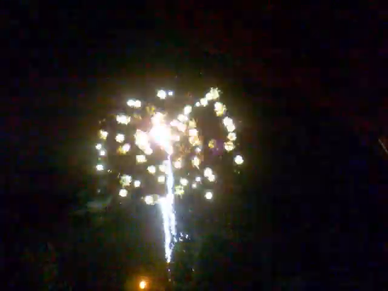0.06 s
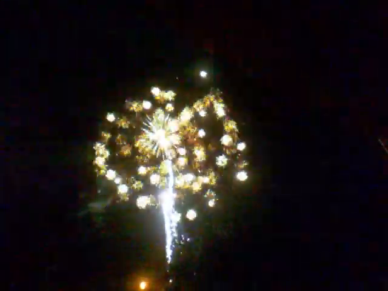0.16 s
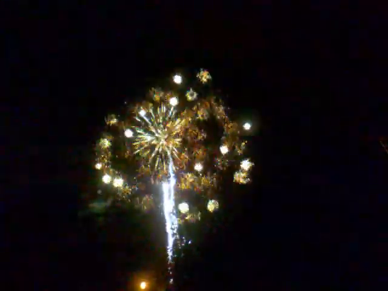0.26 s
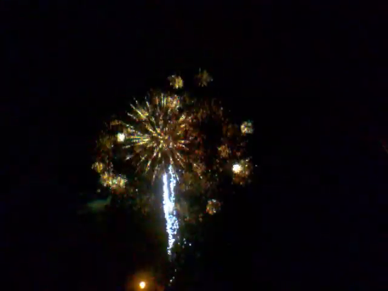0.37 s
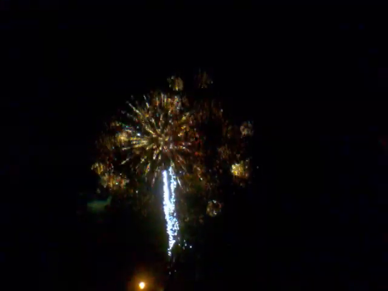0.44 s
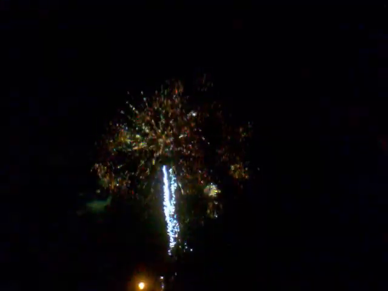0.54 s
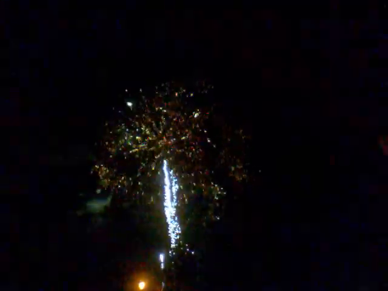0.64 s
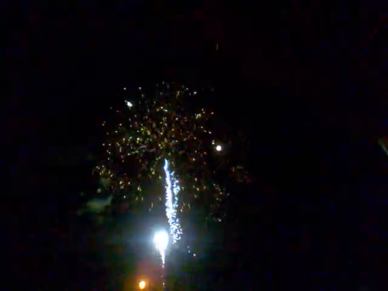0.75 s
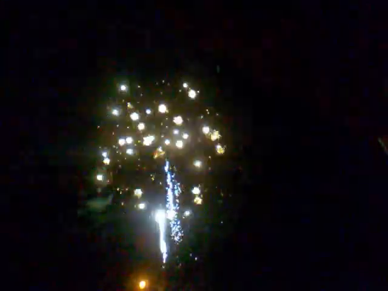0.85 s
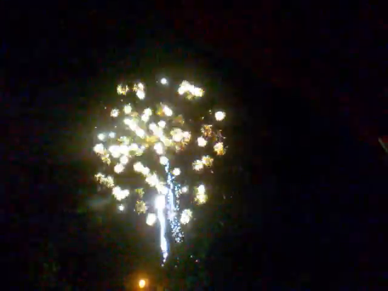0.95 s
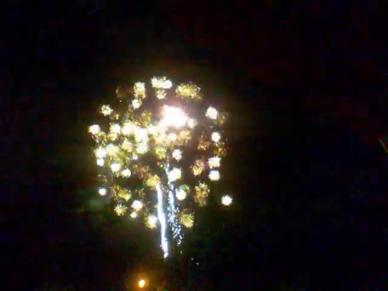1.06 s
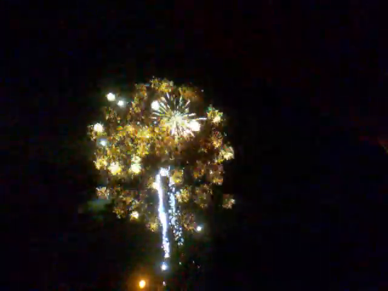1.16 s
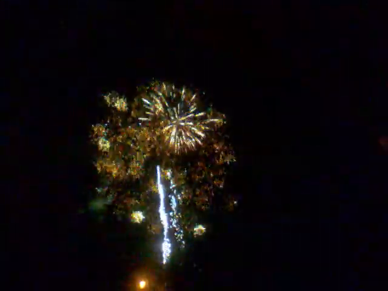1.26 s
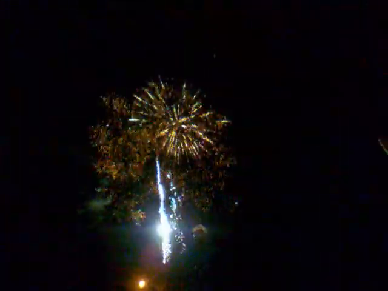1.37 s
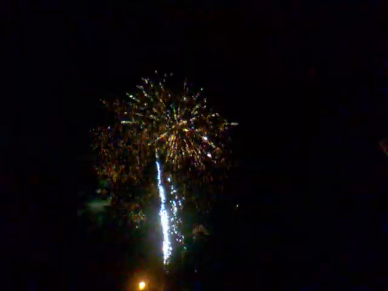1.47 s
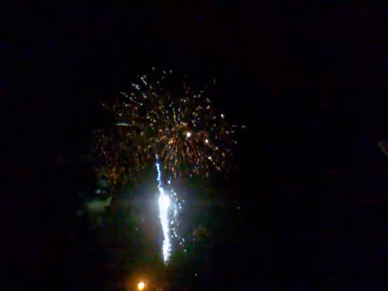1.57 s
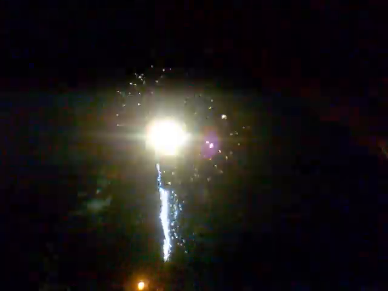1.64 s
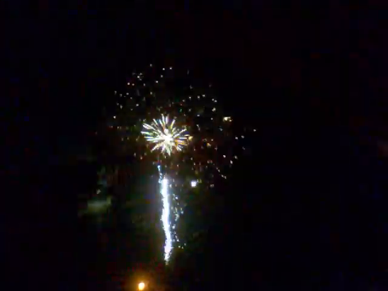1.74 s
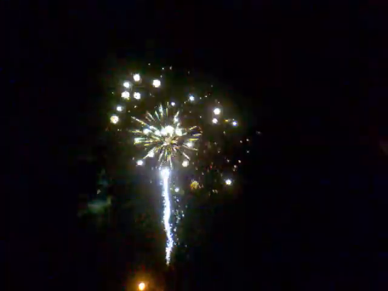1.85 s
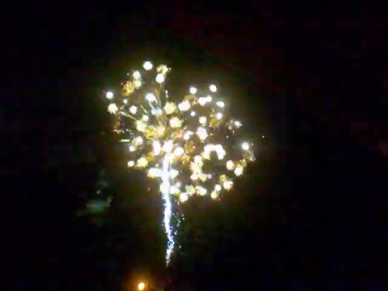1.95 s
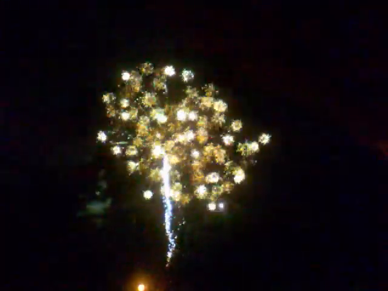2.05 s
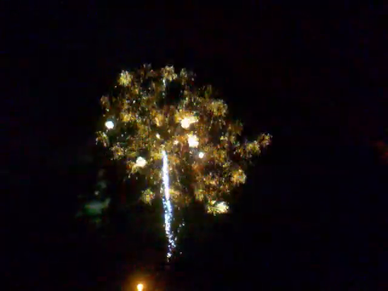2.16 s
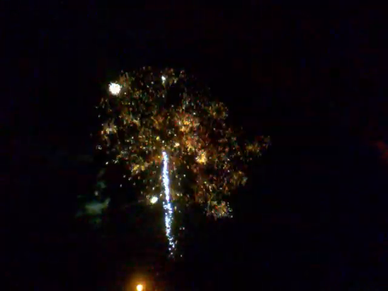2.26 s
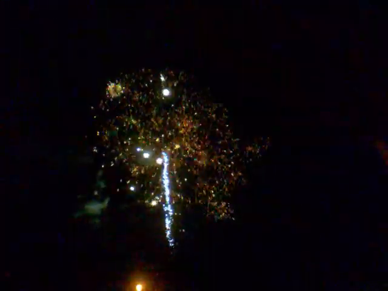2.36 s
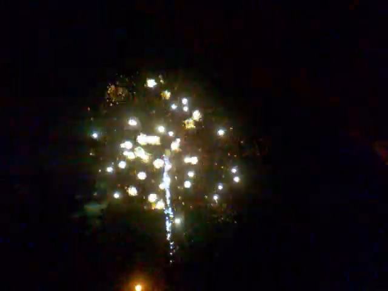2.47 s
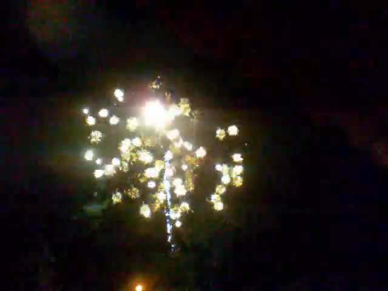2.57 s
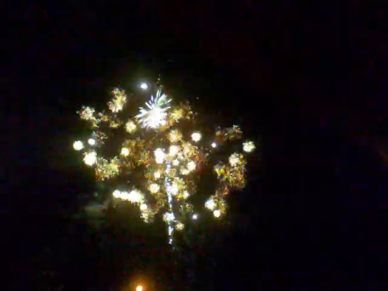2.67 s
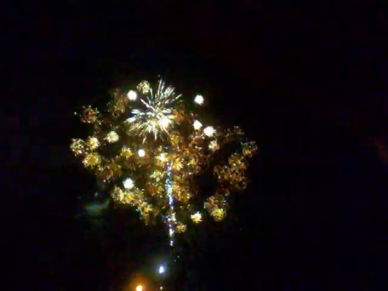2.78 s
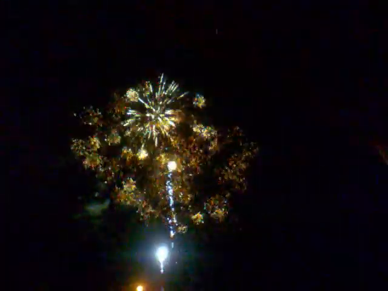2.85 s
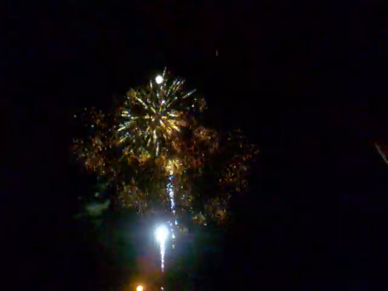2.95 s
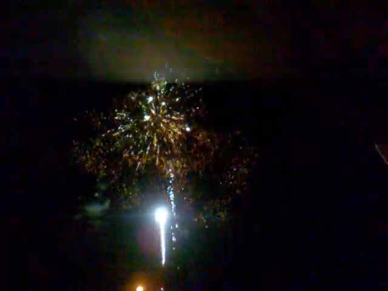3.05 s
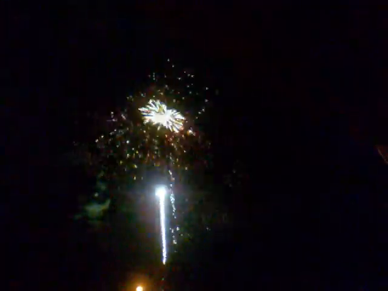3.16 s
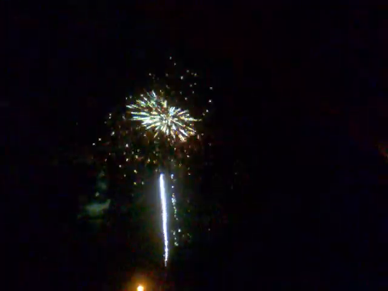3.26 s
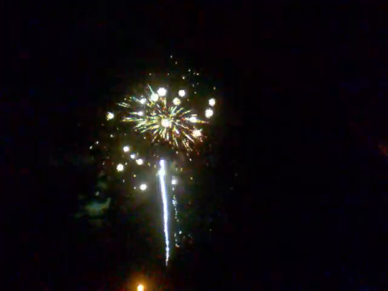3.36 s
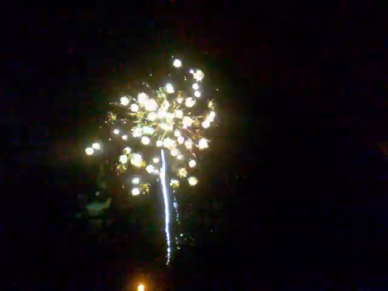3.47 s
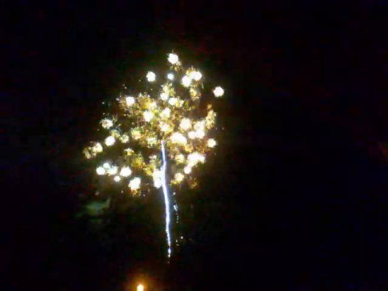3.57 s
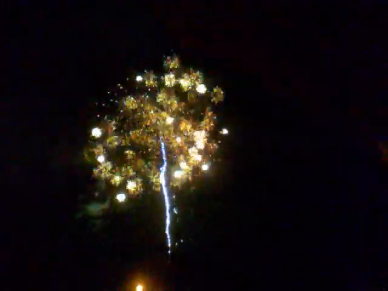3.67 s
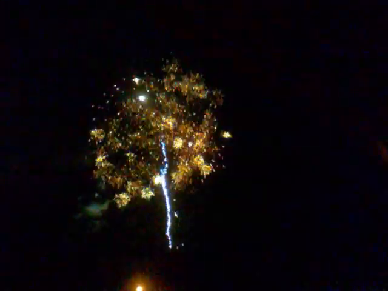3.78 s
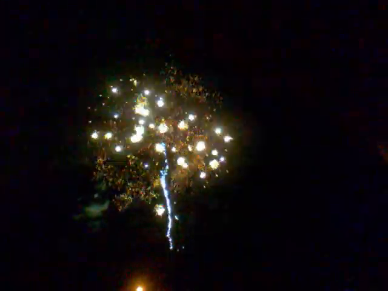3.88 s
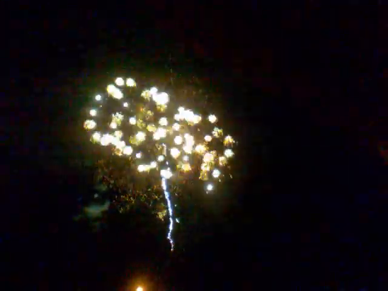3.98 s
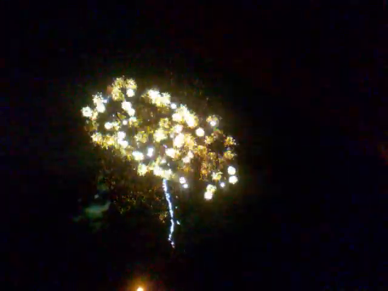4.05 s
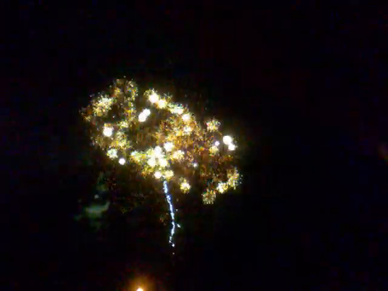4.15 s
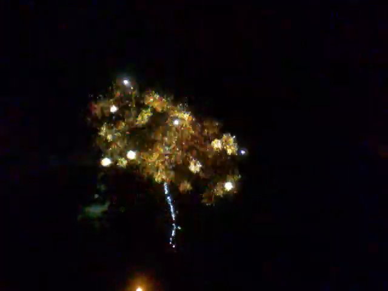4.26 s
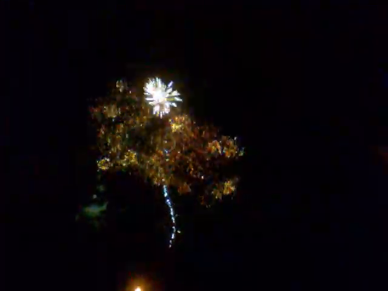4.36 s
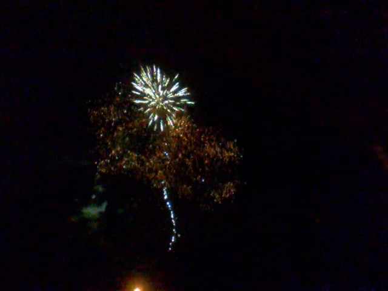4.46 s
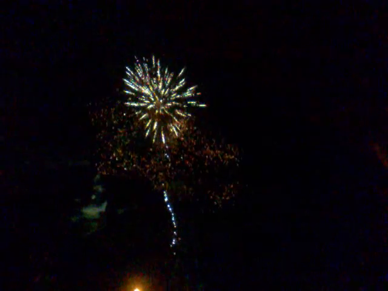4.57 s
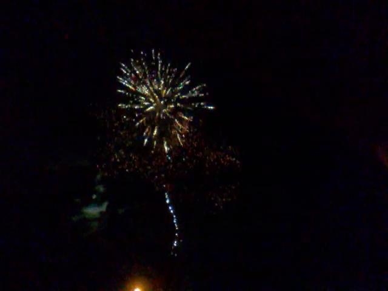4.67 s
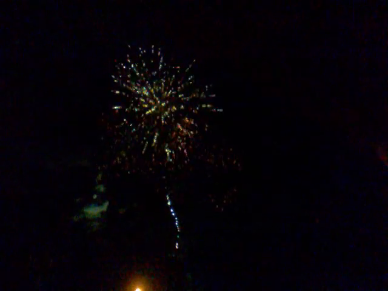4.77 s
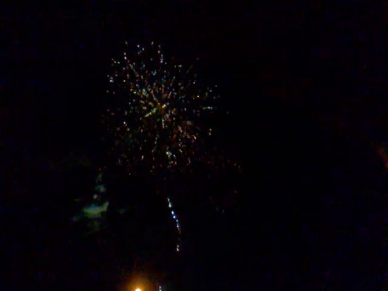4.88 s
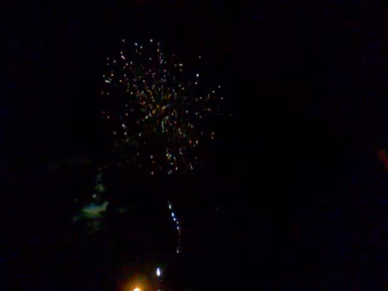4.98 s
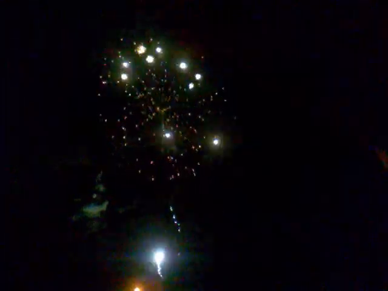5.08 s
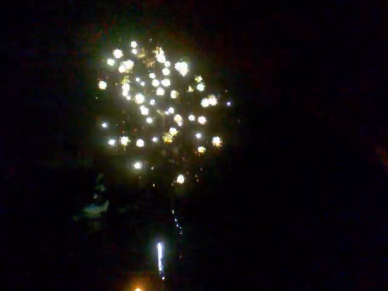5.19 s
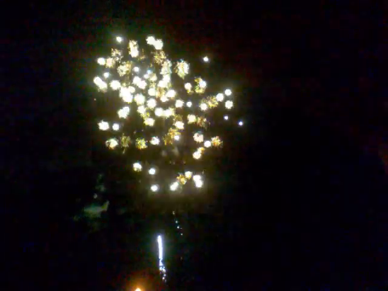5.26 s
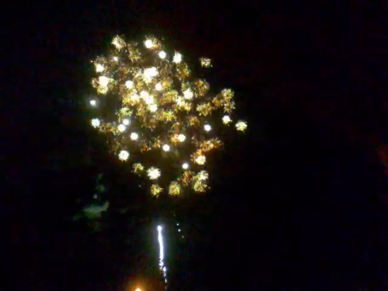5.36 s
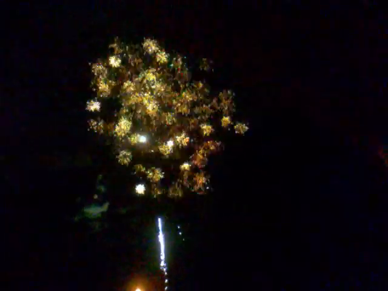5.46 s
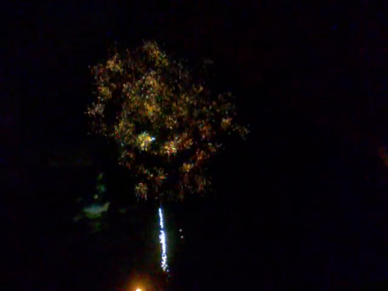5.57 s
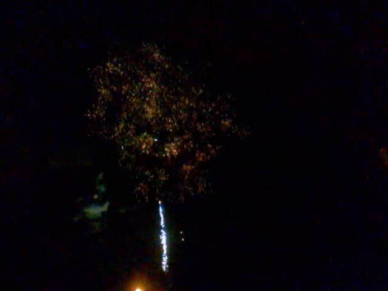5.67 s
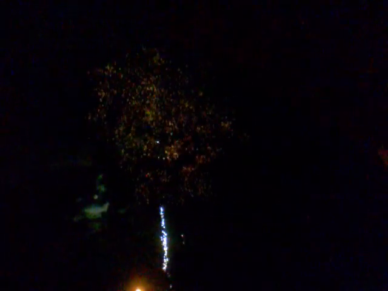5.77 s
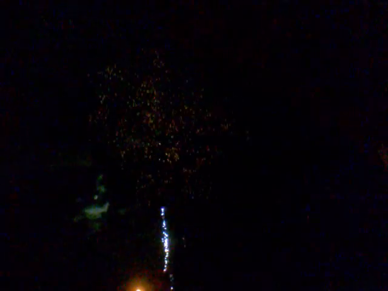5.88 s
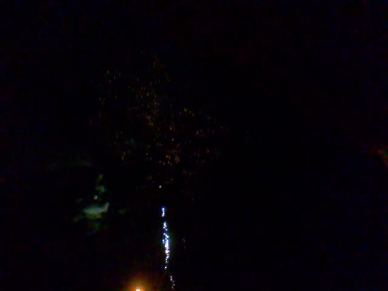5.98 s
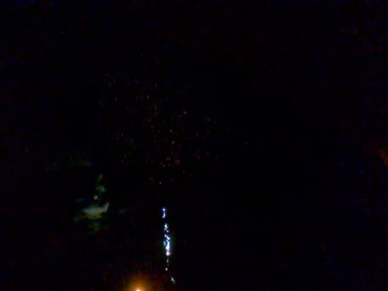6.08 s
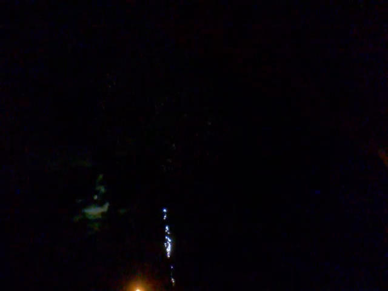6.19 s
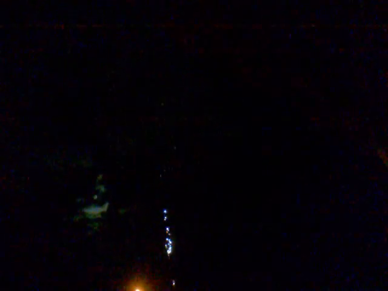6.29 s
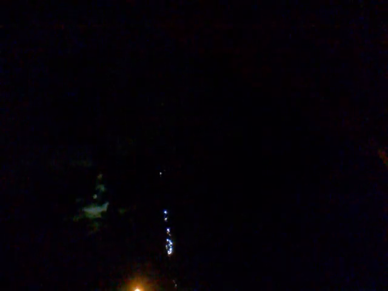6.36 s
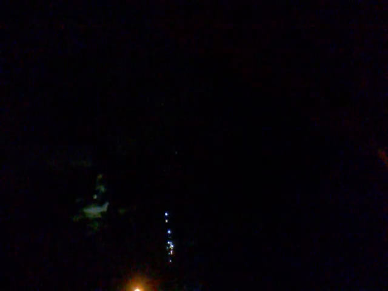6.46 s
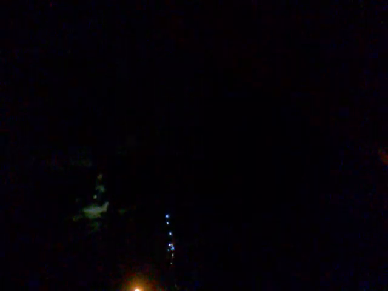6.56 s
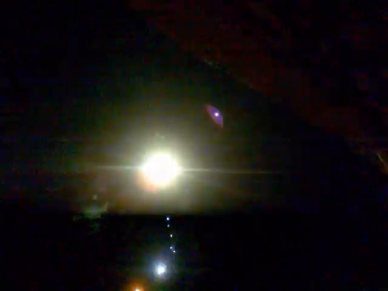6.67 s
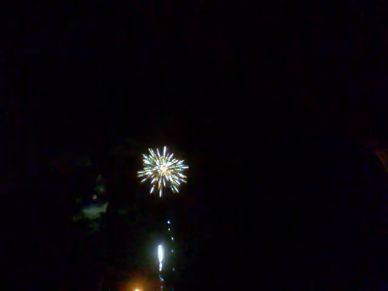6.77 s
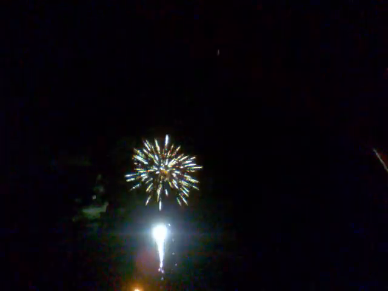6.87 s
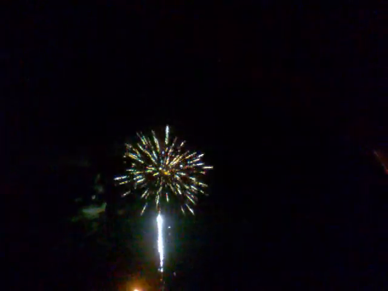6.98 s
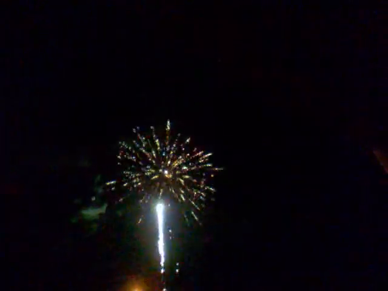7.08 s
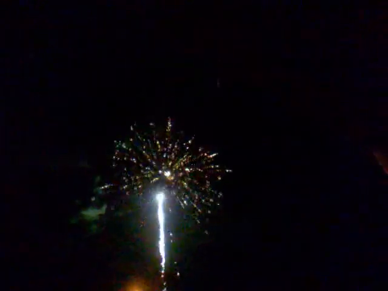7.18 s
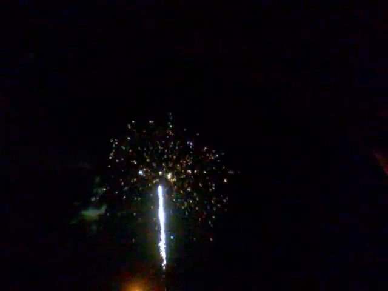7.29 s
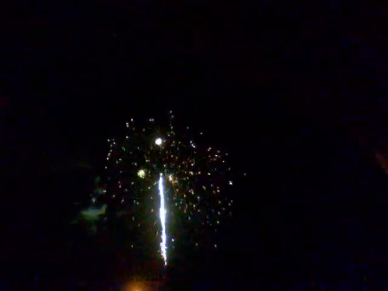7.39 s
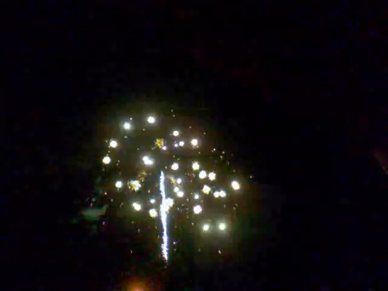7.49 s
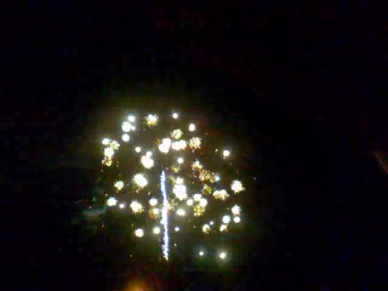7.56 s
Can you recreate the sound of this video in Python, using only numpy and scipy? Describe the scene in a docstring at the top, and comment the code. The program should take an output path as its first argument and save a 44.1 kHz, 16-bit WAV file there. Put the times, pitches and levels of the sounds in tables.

```python
"""Shells burst overhead with sharp bangs, their stars crackle in showers and mortars thump, at night.
Each bang is a blast wave convolved with a random echo response: the ground and close walls smear it, far
walls return it a fifth of a second later and the neighbourhood rolls on. Star pops are filtered impulses.
A launch adds a rounded push and hissing gas. Behind lie steady air, a far engine hum, a distant thud and
faint falling tones, all made of noise and sines. A small microphone colours the fireworks; loud peaks clip."""
import sys
import numpy as np
from scipy import signal
from scipy.fft import rfft, irfft, next_fast_len
from scipy.io import wavfile
from scipy.ndimage import uniform_filter1d, map_coordinates

SR = 44100
rng = np.random.default_rng(int(sys.argv[2]) if len(sys.argv) > 2 else 0)


def unload_audio(sound):
    """Save the sound as a 16-bit wav file, at the path given as the first command line argument."""
    columns = np.transpose(np.atleast_2d(sound))
    # keep every value between -1 and 1, then stretch to whole-number steps
    steps = np.round(np.clip(columns, -1, 1) * 32767)
    wavfile.write(sys.argv[1], SR, steps.astype(np.int16))


N = 336483  # length in samples

# Shell bursts, the first already rolling away. Each row: time in seconds, charge in relative dB, then the
# relative dB of near scatter, walls, roll and later walls, and the extra way to the walls in seconds.
SHELL_BURSTS = [(-.55, 20.5, -6, 2, 1.5, -1, 0), (.4235, 16.5, -16, -1, -5.5, 1, 0.0057),
                (1.4275, 8.5, -5.5, 6, 0.5, 0.5, 0.00065), (2.002, 14.5, -12.5, -1, -6, 4, 0.00087),
                (2.9555, 11, -7.5, 2.5, -2.5, -0.5, 0.0003), (3.4567, 14.5, -11.5, 0.5, -6, 2.5, .001),
                (4.6874, 10.5, -7.5, 1.5, 1.5, 0.5, -0.0042), (7.0324, 12.5, -7.5, 5, 1, -3, 0.0029)]
# Far walls as heard from the sky. Each row: delay in seconds, scatter in relative dB, rise in seconds,
# t60 in seconds, flat face in relative dB.
SKY_WALLS = [(0.182, 5, 0.028, 0.19, -2), (0.287, -13, 0.041, 0.48, -17.5), (.4, -23, .01, .2, -32.5)]


def bursts():
    """Detonation in open air: a very short rise and a strong shock front make a sharp crack."""
    return bangs(SHELL_BURSTS, SKY_WALLS, width=0.0007, rise=.00003, front_db=9.5, heave_db=-13.5, slap_db=-1.5)


def pressure_wave(t, width, rise):
    """Blast-wave principle: overpressure decays through zero into suction; width and rise in seconds."""
    u = t / width
    return (1 - u) * np.exp(-u) * (1 - np.exp(-(t + 1 / SR) / rise))


def bangs(table, walls, width, rise, front_db, heave_db, slap_db):
    """Linear superposition: every blast is convolved with its own echo response and added in place."""
    out = np.zeros(N + 4 * SR)  # one spare second in front, for a bang before the start
    t = np.arange(SR // 10) / SR
    blast = pressure_wave(t, width, rise)
    blast[0] += amp(front_db)  # the shock front cracks
    # the slow push of the expanding gas is too long to be scattered
    heave = amp(heave_db) * pressure_wave(t, 0.0082, rise)
    for s, charge_db, *place in table:
        clear, diffuse = space(walls, *place, slap_db=slap_db)
        heard = signal.fftconvolve(blast + heave, clear)
        heard += signal.fftconvolve(blast, diffuse)
        out[round((s + 1) * SR):][:len(heard)] += amp(charge_db) * heard
    return out[SR:SR + N]


# Showers of stars that swell, hold and thin out. Each row: first star in seconds, swell, hold and whole
# length in seconds, full level in relative dB, swell in dB per second, thinning in dB per second.
STAR_SHOWERS = [(0, 0, 0.0086, .23, -29.5, 100, 68), (0.304, 0.079, 0.076, .52, -12.5, 300, 56),
                (1.16, .16, 0.058, .68, -9.5, 108, 55), (2.064, 0.25, 0.064, .66, -13, 65, 91.5),
                (2.769, 0.058, .25, .6, -13, 75, 116), (3.654, 0.15, 0.12, .5, -13.5, 152, 136),
                (4.093, 0.29, 0.088, .58, -11.5, 79.5, 114), (5.49, 0.097, 0.073, .335, -11.5, 195, 72)]
# Single loud stars. Each row: time in seconds, strength in relative dB.
LOUD_STARS = [(0.053, -13), (.2219, -7.5), (0.251, -1), (.2567, 7), (.2997, 2.5), (0.3275, 2), (0.3606, 4),
              (.5683, 14), (0.603, 7), (0.655, 10), (.699, 8), (.7551, 15), (0.7933, 8), (1.011, -6.5),
              (1.1663, 13.5), (1.183, -14), (1.197, -5), (1.2268, 13), (1.288, 9), (1.3195, 18), (1.508, 0),
              (1.5468, 16), (2.2859, 17), (2.3446, 15.5), (2.4643, 12), (2.5773, 5), (2.5915, 11),
              (2.683, -4), (2.7708, 3), (2.8328, 16.5), (3.049, -6), (3.1022, 16.5), (3.3082, 10),
              (3.7498, 10), (3.798, 13), (3.809, 14), (3.826, 8), (3.8417, 10), (3.8894, 16), (3.914, 14),
              (3.9514, 0), (3.9675, -3), (3.9938, -7), (4.025, 2), (4.0506, 12.5), (4.09, 9), (4.118, 0),
              (4.158, 5.5), (4.1834, 0), (4.202, 0), (4.2158, 13), (4.2502, 10), (4.2802, 13.5),
              (4.3111, 14), (4.334, 14.5), (4.364, 14), (4.374, 16), (4.3874, 17), (4.4234, 8),
              (4.4459, 13.5), (4.4722, 18), (4.5157, 14), (4.6007, 6), (4.659, 12.5), (5.4156, -6.5),
              (5.4932, -1), (5.5094, 6), (5.5263, 8), (5.574, 11), (5.5867, 22), (5.7042, 10), (5.751, 14),
              (5.8141, 12)]
# Spectrum of one star pop. Each row: frequency in Hz, gain in dB.
STAR_SPECTRUM = [(60, -46), (130, -12), (250, -3.5), (450, -5), (800, 2), (1500, 1.5), (3000, 0),
                 (6000, -3.5), (10000, -6), (16000, -15.5)]
# three smaller pops follow a loud star within this time, at this level beside it
SPLINTER_S, SPLINTER_DB = .009, -8.5


def crackle(groups=4):
    """Random impulse process: pops grow denser and louder with the shower; each sky part has its echoes."""
    level_db = np.max([shower_db(*row) for row in STAR_SHOWERS], axis=0)
    level_db += 3 * wobble(60)
    when, chance, size, part = rng.random((7000, 4)).T
    at = (when * N).astype(int)
    group = (part * groups).astype(int)
    star_db = level_db[at]
    density = np.clip(amp(0.56 * (star_db + 18)), .06, .45)
    lit = np.clip(20 * (density - chance), 0, 1)
    size_db = 16.5 - 3.13 * np.log(size + 0.06)  # few strong stars, many weak ones
    strength = lit * amp(star_db + size_db) / np.sqrt(density)
    out = np.zeros(N)
    for k in range(groups):
        clicks = np.bincount(at, strength * (group == k), N)
        for s, db in LOUD_STARS[k::groups]:
            late = np.append(0, rng.random(3))  # the star itself, then its splinters
            places = ((s + SPLINTER_S * late) * SR).astype(int)
            np.add.at(clicks, places, amp(db + SPLINTER_DB * (late > 0)))
        clear, diffuse = space(SKY_WALLS, -13.0, -18.5, -12, slap_db=-8.5)
        out += signal.fftconvolve(clicks, clear + diffuse)[:N]
    return coloured(out, STAR_SPECTRUM)


def shower_db(first, swell, hold, length, full_db, rise, fall):
    """Exponential growth and decay: the level of one shower follows straight lines in dB."""
    t = np.arange(N) / SR - first
    under = rise * np.clip(swell - t, 0, None)
    under += fall * np.clip(t - swell - hold, 0, None)
    return np.where((t >= 0) & (t < length), full_db - under, -120)


# Mortar launches. Each row: time in seconds, charge in relative dB, then the relative dB of near scatter,
# walls, roll and later walls, and the extra way to the walls in seconds.
MORTAR_LAUNCHES = [(1.151, 14.3, -43, -20.5, -8, 0, 0), (2.792, 11.7, -5.5, -16, -24.5, 0, 0),
                   (6.604, 18.2, -31, -23, -13, 0, 0.0098)]
# Walls as heard from the mortar on the ground. Each row: delay in seconds, scatter in relative dB,
# rise in seconds, t60 in seconds, flat face in relative dB.
GROUND_WALLS = [(0.198, 5, .004, 0.31, 9), (0.224, 1, .004, 0.074, -1.5), (0.271, -4, 0.0048, 0.11, 0.5)]
# Response of the mortar tube. Each row: frequency in Hz, gain in dB.
TUBE_RESPONSE = [(40, -16.5), (100, -6), (190, -0.5), (330, -1.5), (550, -17.5), (1200, -0.5),
                 (2500, -12.5), (16000, -5)]
# Spectrum of the escaping gas. Each row: frequency in Hz, relative density in dB per Hz.
GAS_SPECTRUM = [(200, -40), (600, -8), (1500, -2), (2800, -8), (5000, -11), (9000, -3), (16000, -10)]


def mortars():
    """Confined charge and jet noise: the tube rounds the push, gas hisses out and the rising comet fizzes."""
    t = np.arange(N) / SR

    def decay(s, t60):
        """Exponential decay from time s."""
        return (t > s) * amp(-60 * abs(t - s) / t60)

    jet = np.zeros(N)
    for s, charge_db, *_ in MORTAR_LAUNCHES:
        hiss = amp(-32.0) * decay(s, 0.12)
        fizz = amp(-50.5) * decay(s, 1.3)
        answers = sum(amp(-55.5) * decay(s + wall[0], 0.07) for wall in GROUND_WALLS)
        jet += amp(charge_db) * (hiss + fizz + answers)
    push = bangs(MORTAR_LAUNCHES, GROUND_WALLS, width=0.0017, rise=0.00088,
                 front_db=-2, heave_db=-24, slap_db=-8.5)
    return coloured(push, TUBE_RESPONSE) + jet * amp(1.5 * wobble(60)) * noise(GAS_SPECTRUM)


# Decay of the neighbourhood roll. Each row: frequency in Hz, t60 in seconds.
ROLL_DECAY = [(60, 1.11), (200, 0.91), (600, 0.79), (2000, 0.87), (6000, 0.81), (14000, 0.33)]


def neighbourhood_roll(length):
    """Frequency-dependent reverberation: each band of noise dies exponentially at its own speed."""
    hz, frames, z = signal.stft(rng.standard_normal(length), SR, nperseg=256)
    decay = amp(-60 * frames / along(ROLL_DECAY, hz)[:, None])
    return signal.istft(z * decay, SR, nperseg=256)[1][:length]


def lumps(length):
    """Uneven scattering: noise whose level varies at random reflects like irregular surfaces."""
    lump_db = 4.8 * unit(uniform_filter1d(rng.standard_normal(length), size=120))
    return rng.standard_normal(length) * amp(lump_db)


def swell(s, rise, t60):
    """Build-up and decay of scattered energy: rise and t60 in seconds, silent before s = 0."""
    return (s > 0) * (1 - np.exp(-abs(s) / rise)) * amp(-60 * abs(s) / t60)


# Close walls. Each row: delay in seconds, level in relative dB.
CLOSE_WALLS = [(.0038, -13), (.0065, -19.5), (.01, -6), (0.014, -12.5), (.024, 0), (.035, -8), (0.065, -8)]
# Rough close walls return the low part. Each row: frequency in Hz, gain in dB.
CLOSE_RESPONSE = [(30, -1), (150, -12), (550, 3.5), (900, -9), (2000, -9.5), (16000, -39)]
# Near scatter, with the dip where the ground path cancels. Each row: frequency in Hz, gain in dB.
NEAR_RESPONSE = [(30, -30.5), (90, -8), (150, -8.5), (350, 1), (560, 2), (760, -3), (1200, 2.5), (3000, -3),
                 (8000, 3), (16000, 14.5)]
# Far scatter, with the same kind of dip. Each row: frequency in Hz, gain in dB.
FAR_RESPONSE = [(30, -17), (90, -4), (150, -4.5), (350, -1), (580, 0), (760, -6.5), (1200, -3), (3000, -12),
                (8000, -15.5), (16000, -1)]
# What a flat wall returns. Each row: frequency in Hz, gain in dB.
FACE_RESPONSE = [(30, -18), (400, 4.5), (1000, -2.5), (4000, -14), (16000, -17)]


def space(walls, near_db, wall_db, roll_db, later_db=0, lag=0, slap_db=0):
    """Specular and diffuse reflection: a random response, as direct sound with faces, and scatter with roll."""
    n = 2 * SR
    t = np.arange(n) / SR
    near = amp(near_db - 18) * swell(t - .001, 0.00014, 0.13) * lumps(n)
    slaps, scatter, faces = np.zeros((3, n))
    for s, db in CLOSE_WALLS:
        slaps[round(s * SR)] = amp(db + slap_db + rng.normal(0, 4.7))
    for k, (s, db, rise, t60, face_db) in enumerate(walls):
        gain = amp(wall_db + later_db * (k > 0))
        # roofs and edges answer just ahead of the face
        scatter += gain * amp(db - 23) * swell(t - s - lag + 0.011, rise, t60)
        faces[round((s + lag) * SR)] = gain * amp(face_db)  # a flat face returns one sharp copy
    roll = neighbourhood_roll(n)
    # the far roll builds up as ever more distant surfaces answer
    far_roll = amp(wall_db - 18.5) * swell(t - SKY_WALLS[0][0], 0.06, 40) * roll
    diffuse = coloured(near + amp(roll_db - 30.0) * roll, NEAR_RESPONSE)
    diffuse += coloured(slaps, CLOSE_RESPONSE)
    diffuse += coloured(scatter * lumps(n) + far_roll, FAR_RESPONSE)
    clear = coloured(faces, FACE_RESPONSE)
    clear[0] += 1  # direct sound
    return clear, diffuse


# Response of the small microphone. Each row: frequency in Hz, gain in dB.
MIC_RESPONSE = [(20, -2.5), (60, 2), (150, -0.5), (1600, -3), (2300, 0), (2900, 3.5), (3500, -2),
                (4400, -7), (5800, -22), (9000, -31.5), (16000, -47)]


def microphone(x):
    """Linear transduction: the capsule filters the pressure and inverts its polarity."""
    return -coloured(x, MIC_RESPONSE)


# Steady air and capsule hiss. Each row: frequency in Hz, relative density in dB per Hz.
AIR_SPECTRUM = [(60, -14), (200, -29), (500, -7.5), (1000, -9), (2700, -15), (5100, -29), (8000, -38.5),
                (16000, -29)]
# Far engine spectrum. Each row: frequency in Hz, relative density in dB per Hz.
ENGINE_SPECTRUM = [(15, -47), (30, -24), (60, -0.5), (90, 0.5), (140, -11), (200, -20), (400, -23.5),
                   (800, -77)]
# Far engine level before a slight random wobble. Each row: time in seconds, level in dB.
ENGINE_LEVEL = [(0, -38.5), (.4, -33.5), (.9, -46.5), (1.3, -31.5), (2.4, -32.5), (2.75, -39.5), (3.3, -30),
                (4, -34.5), (4.65, -29), (5.3, -42.5), (5.8, -34.5), (6.3, -44), (7, -37), (7.63, -47)]


def night():
    """Superposed independent sources: steady air, an uneven engine hum, a thud and falling tones."""
    air = amp(-57) * noise(AIR_SPECTRUM)
    engine = amp(curve(ENGINE_LEVEL) + 0.5 * wobble(4.1)) * noise(ENGINE_SPECTRUM)
    return air + engine + distant_thud() + falling_tones()


# A distant mortar. The one row: start in seconds, level in dB, frequency in Hz, t60 in seconds.
DISTANT_MORTAR = (6.37, -23, 91, 0.2)


def distant_thud():
    """Damped oscillation: a low sine with a soft onset dies away exponentially."""
    out = np.zeros(N)
    s, db, hz, t60 = DISTANT_MORTAR
    t = np.arange(SR // 2) / SR
    envelope = amp(db - 60 * t / t60) * (1 - np.exp(-t / 0.012))
    out[round(s * SR):][:len(t)] += envelope * np.sin(2 * np.pi * hz * t)
    return out


# Faint tones far off. Each row: start in seconds, length in seconds, first pitch in Hz,
# level in dB before a random wobble.
FAR_TONES = [(6.08, 0.13, 890, -51), (6.19, 0.2, 667, -67), (6.42, 0.62, 1019, -58.5)]
SINK_HZ_PER_S, FADE_S = 280, .06


def falling_tones():
    """Linear frequency sweep: the phase is the integral of a steadily sinking pitch."""
    out = np.zeros(N)
    for s, length, hz, db in FAR_TONES:
        u = np.arange(N) / SR - s
        fade = np.clip(np.minimum(u, length - u) / FADE_S, 0, 1)
        phase = 2 * np.pi * (hz - SINK_HZ_PER_S * u / 2) * u
        out += fade * amp(db + 2 * wobble(29)) * np.sin(phase)
    return out


def noise(points):
    """Spectral shaping: white noise weighted in frequency by (Hz, dB) points, at rms 1."""
    m = next_fast_len(N)
    gains = amp(along(points, np.fft.rfftfreq(m, 1 / SR)))
    return unit(irfft(rfft(rng.standard_normal(m)) * gains, m)[:N])


def coloured(x, points):
    """Minimum-phase filtering: folding the cepstrum makes a causal filter with these (Hz, dB) gains."""
    m = 8192
    gains = amp(along(points, np.fft.rfftfreq(m, 1 / SR)))
    cepstrum = irfft(np.log(gains), m)
    cepstrum[1:m // 2] *= 2
    cepstrum[m // 2 + 1:] = 0
    impulse = irfft(np.exp(rfft(cepstrum)), m)[:m // 2]
    return signal.fftconvolve(x, impulse)[:len(x)]


def wobble(rate):
    """Random modulation: a smooth spline through random knots, rate of them a second."""
    return map_coordinates(rng.standard_normal(N // 400), [np.arange(N) * rate / SR])


def curve(rows):
    """Linear interpolation of (seconds, value) rows, one value per sample."""
    return np.interp(np.arange(N) / SR, *np.transpose(rows))


def along(points, hz):
    """Logarithmic pitch scale: (Hz, value) points interpolated on a log axis."""
    f, v = np.transpose(points)
    return np.interp(np.log(hz + 1), np.log(f + 1), v)


def unit(x):
    """Power normalisation: x at rms 1."""
    return x / np.sqrt(np.mean(x ** 2) + 1e-20)


def amp(db):
    """Decibel law: the amplitude gain of a level in dB."""
    return 10 ** (np.asarray(db) / 20)


def scene():
    """Superposition: the fireworks through the microphone, over the background."""
    fireworks = bursts() + mortars() + crackle()
    return (microphone(fireworks) + night())[None]


TOP_HZ = 16700  # band limit


def record(dry):
    """Saturation and band limiting: the preamplifier clips, then a steep low-pass removes the top."""
    clipped = dry / (1 + np.abs(dry / .71) ** 7) ** (1 / 7)
    low_pass = signal.cheby2(14, 70, TOP_HZ, fs=SR, output="sos")
    return signal.sosfilt(low_pass, clipped)


dry = scene()
out = record(dry)
unload_audio(out)
```